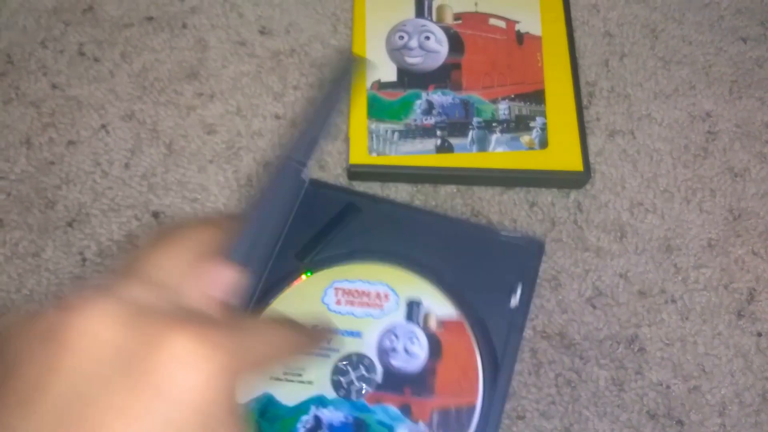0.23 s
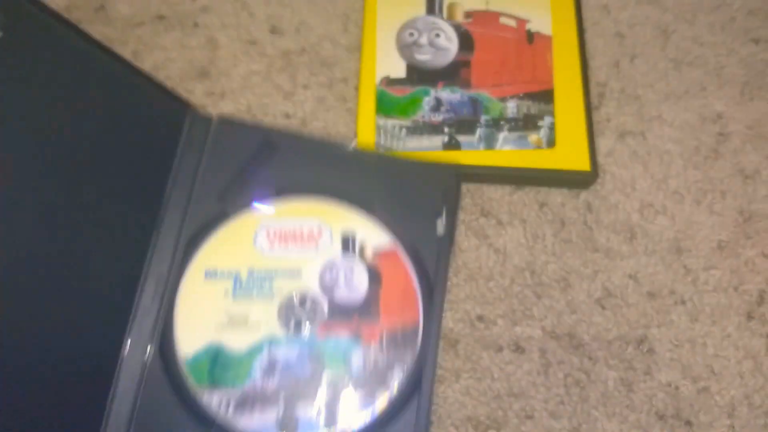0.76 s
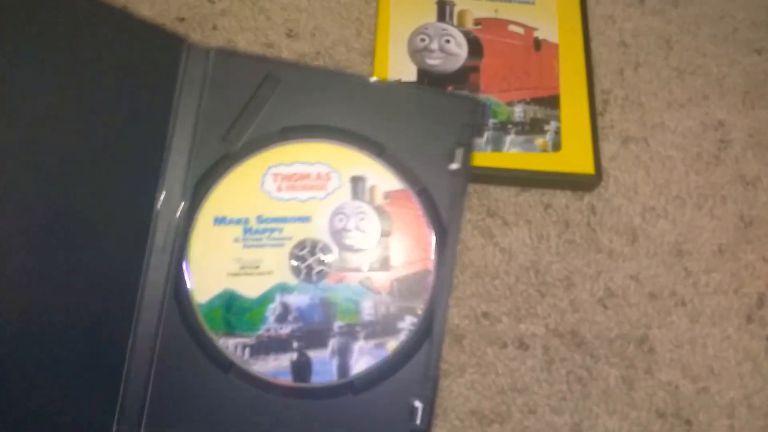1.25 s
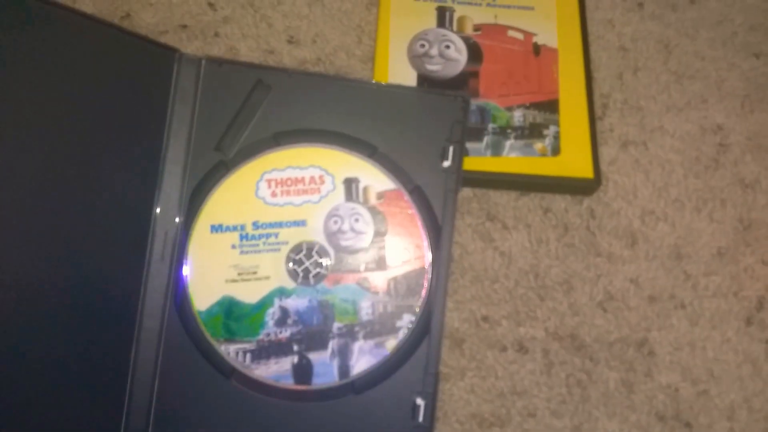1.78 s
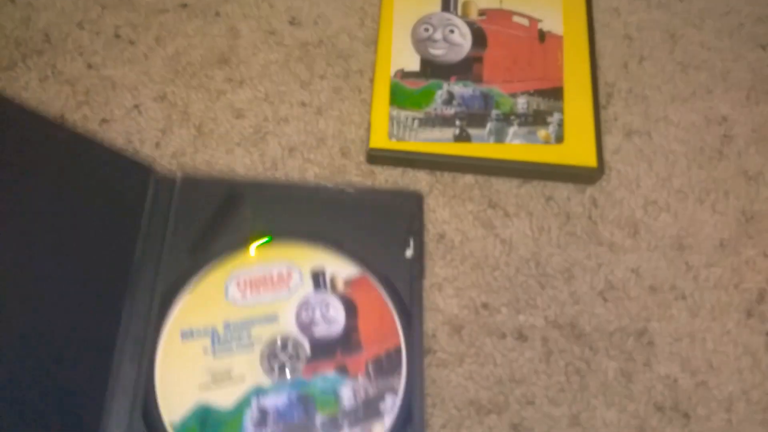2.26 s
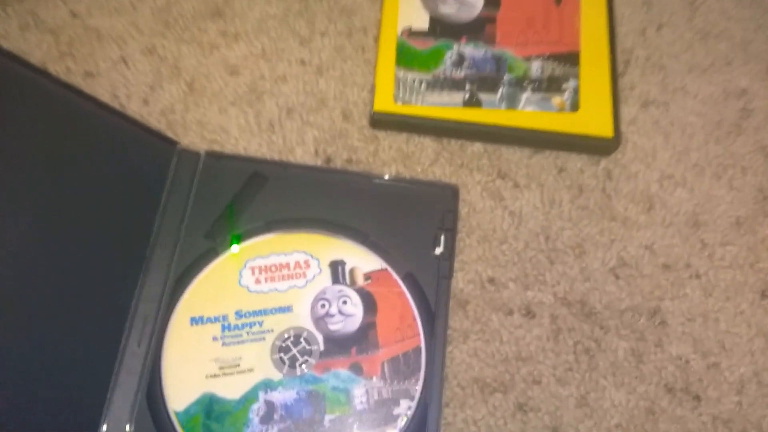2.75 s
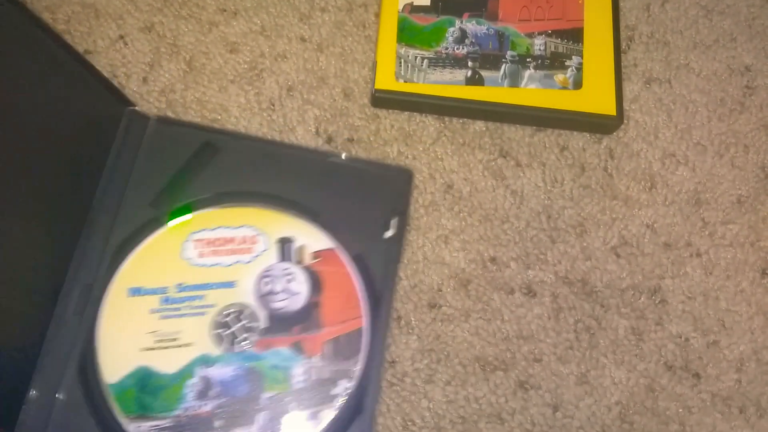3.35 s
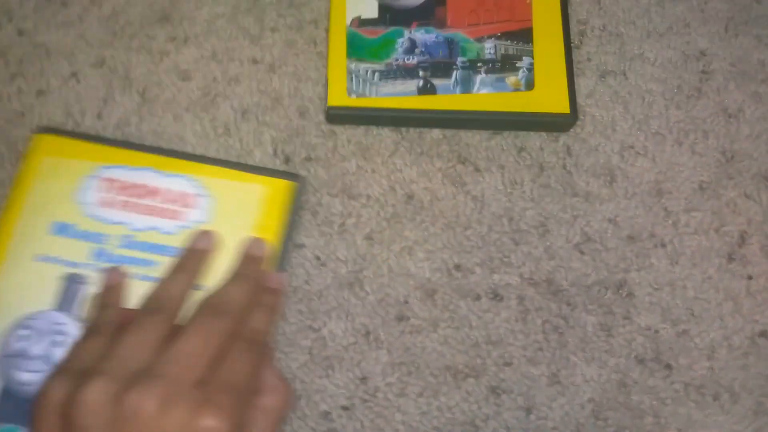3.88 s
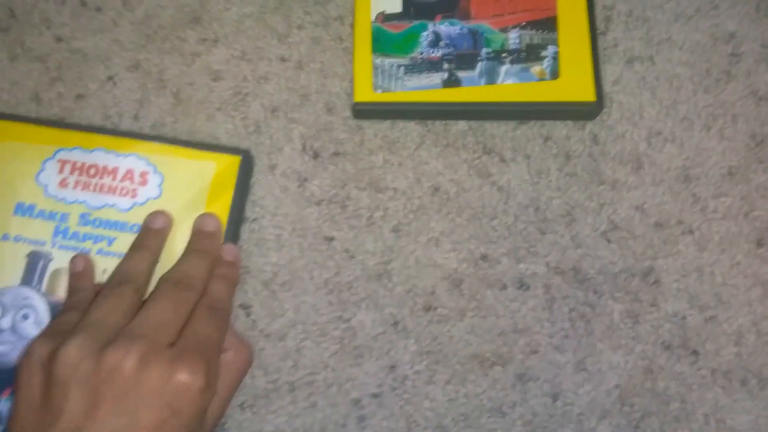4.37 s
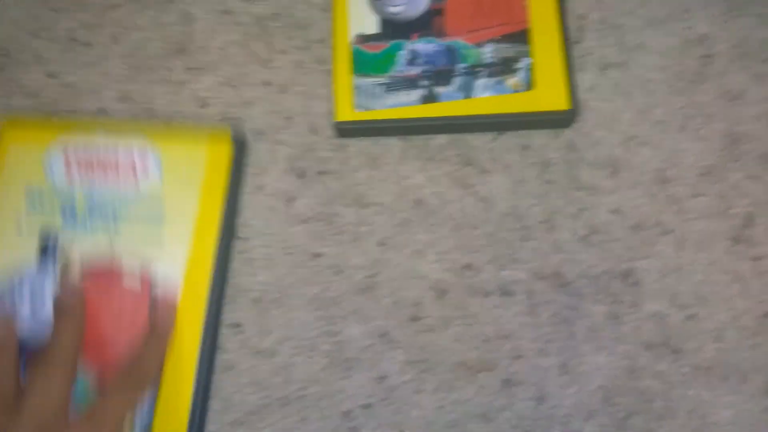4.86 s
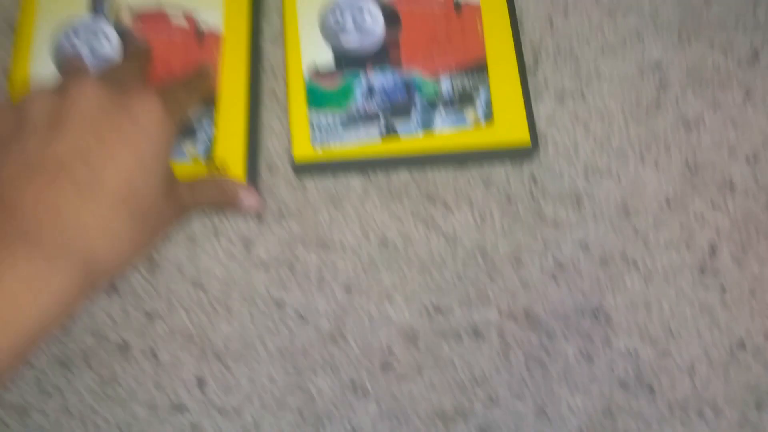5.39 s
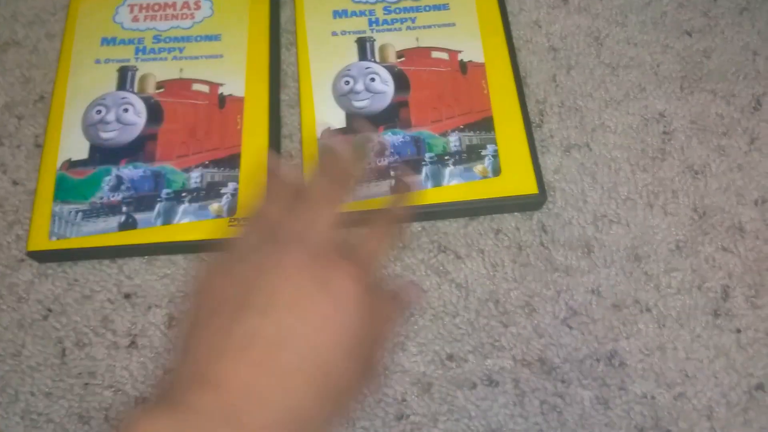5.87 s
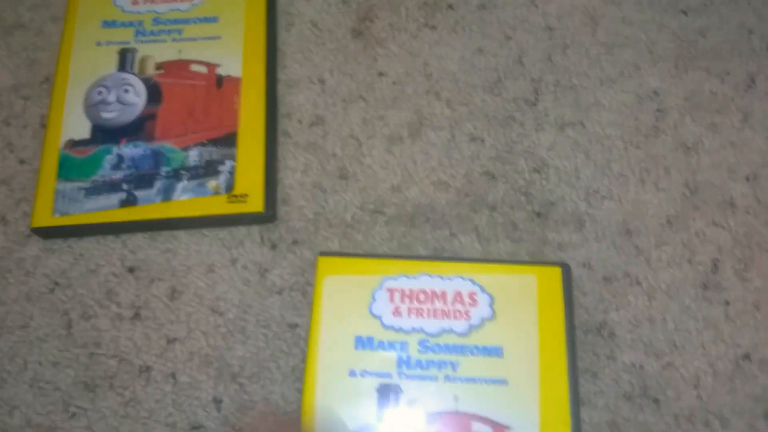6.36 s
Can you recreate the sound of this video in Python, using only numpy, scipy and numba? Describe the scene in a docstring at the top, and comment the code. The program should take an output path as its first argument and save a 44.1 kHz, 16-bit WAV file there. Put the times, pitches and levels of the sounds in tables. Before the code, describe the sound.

Sharp plastic clicks of a thin case being opened, closed and set down on carpet, with faint rubbing, small squeaks and low handling bumps.

```python
"""A plastic disc case is opened, shifted, snapped shut and slid over a carpet near the left port of a phone.
Clicks of clasps and edges: a blow, slips and loose rattle ring damped modes of shell, edges and crack.
Squeaks are noise in gliding bands; fingers and carpet rustle as flickering coloured noise; the hand thuds
on the phone as swelling band-passed bass. A short dull room tail follows the clicks.
The phone widens its two ports by subtracting each from the other a moment later."""
import sys
import numpy as np
from scipy import signal
from scipy.fft import rfft, irfft, next_fast_len
from scipy.io import wavfile
from scipy.ndimage import uniform_filter1d
from numba import njit

SR = 44100
rng = np.random.default_rng(int(sys.argv[2]) if len(sys.argv) > 2 else 0)


def persist_wave(psi):
    """Save psi, clipped to +-1, as 16-bit WAV."""
    counts = np.round(np.clip(psi, -1, 1) * 32767).astype(np.int16)
    wavfile.write(sys.argv[1], SR, np.atleast_2d(counts).T)


N = 292383

# rubbing and room hush: t/s, rustle level/dB, hiss level/dB, rumble level/dB (before the rumble gain)
HUSH = [(0.0, -70, -73.5, -63.5), (0.15, -72, -74.5, -73), (0.29, -75.5, -82.5, -73.5),
        (0.64, -74.5, -83, -73.5), (1.03, -73.5, -79.5, -73), (1.64, -67.5, -82, -64.5),
        (2.12, -68, -70, -61), (2.3, -61, -75, -66.5), (2.6, -64.5, -74, -62.5), (2.77, -65, -82, -63),
        (2.94, -63, -72.5, -62.5), (3.12, -67, -76, -70.5), (3.55, -66, -72.5, -62.5),
        (3.9, -58.5, -69, -57.5), (4.03, -72, -78.5, -74), (4.63, -70, -77, -65.5), (4.95, -63.5, -71, -61),
        (5.35, -65, -76, -59.5), (5.8, -68.5, -79, -61), (6.15, -60.5, -70.5, -62.5),
        (6.63, -65, -74, -61.5)]


def undb(db):
    """Amplitude factor from dB."""
    return 10 ** (np.asarray(db) / 20)


def unit(x):
    """Scale to rms 1."""
    return x / np.sqrt(np.mean(x ** 2))


def decay(t_s, t60_s):
    """Exponential fade, -60 dB after t60."""
    return np.exp(-np.log(1000) * t_s / t60_s)


def curves(table):
    """Interpolate each column over time, one value per sample."""
    t_s, *columns = np.transpose(table)
    return [np.interp(np.arange(N) / SR, t_s, column) for column in columns]


def colour(x, points):
    """Shape the spectrum by (f/Hz, level/dB) points on a log frequency axis; rms 1."""
    size = next_fast_len(N)
    hz, db = np.transpose(points)
    log_hz = np.log(np.arange(size // 2 + 1) * SR / size + 1)
    gain = undb(np.interp(log_hz, np.log(hz), db, left=-60))
    return unit(irfft(rfft(x, size) * gain, size)[..., :N])


def lowpass(x, hz):
    """First-order low-pass."""
    return signal.lfilter(*signal.butter(1, hz, fs=SR), x)


def walk(rate_hz):
    """Random levels held 1 / rate and slewed; spread near 1."""
    hold = int(SR / rate_hz)
    steps = np.repeat(rng.standard_normal(N // hold + 1), hold)
    return 1.3 * uniform_filter1d(steps, hold)[:N]


@njit
def svf(x, hz, damp):
    """State-variable band-pass with a moving centre; damp is bandwidth / centre."""
    y, band, low = np.empty(len(x)), 0., 0.
    for i in range(len(x)):
        g = np.tan(np.pi * hz[i] / SR)
        v = (band + g * (x[i] - low)) / (1 + g * (g + damp))
        band, low, y[i] = 2 * v - band, low + 2 * g * v, damp * v
    return y


def band_noise(hz, damp):
    """Noise through two band-passes in series, following the centre hz; rms 1."""
    noise = rng.standard_normal(len(hz))
    return unit(svf(svf(noise, hz, damp), hz, damp))


def ring(push, modes, near_hz, favour_db=11.0, scatter_db=2.0, phase=0.53):
    """Damped modes; the spot hit favours those near one pitch. Scaled to peak 1 under the push's start."""
    hz, db, t60_s = np.transpose(modes)[:, :, None]
    level_chance, pitch_chance = rng.standard_normal((2, len(modes), 1))
    db = db + scatter_db * level_chance - favour_db * np.log2(hz / near_hz) ** 2  # loss per octave squared
    t = np.arange(1024) / SR
    swing = np.sin(2 * np.pi * hz * (1 + pitch_chance / 50) * t + phase)
    contact = 1 - np.exp(-t * hz * 4)  # time constant: a quarter cycle
    tone = np.sum(undb(db) * swing * contact * decay(t, t60_s), axis=0)
    return tone / np.abs(signal.fftconvolve(push[:1024], tone)).max()


def click_push(crack_db, shell_db, chatter_s, rattle_db, size):
    """Force of one click: a blow, a dying chatter of slips, then loose parts rattle."""
    rattle_t60_s, slips_per_s = 0.15, 5000
    t = np.arange(size) / SR
    age = t / chatter_s
    slips = rng.standard_normal(size) * (rng.random(size) < slips_per_s / SR)
    push = slips * np.sqrt(age) * np.exp(-age)
    blow = undb(.9 * (crack_db + shell_db + 25))  # a hard snap lets go at once, a soft one crumbles
    push[[14, 40]] = -.3 * blow, blow  # the plastic yields a moment before it lets go
    bursts = undb(4.55 * np.repeat(rng.standard_normal(size // 64), 64))
    loose = rng.standard_normal(size) * bursts
    return push + undb(rattle_db - 9.0) * loose * decay(t, rattle_t60_s)


def clicks():
    """Each push rings shell, edges and crack modes; the right port lies in the phone's shadow."""
    # clicks and snaps; levels before the fixed offsets below: t/s, crack level/dB, shell over crack/dB,
    # edges over crack/dB, chatter time constant/s, rattle level/dB, left minus right/dB, favoured shell f/Hz
    click_events = [(0.1532, -18.5, -5, -5, 0.0023, -26.5, 3, 740),
                    (0.195, -56.5, 5, 10, 0.0071, -2, 9, 1200),
                    (0.279, -71.5, 8.5, 7.5, 0.0022, -34.5, 11, 356),
                    (0.307, -71.5, -9, 6, .003, -20, 16, 824), (0.4794, -70, 4, 1.5, 0.0011, -7, -5, 751),
                    (0.6429, -51, 6, 2.5, 0.0035, -12, 4.5, 940), (0.693, -72.5, 17, 8, 0.013, -7, 8, 816),
                    (0.748, -75, 17, 7, 0.0091, -11, 12, 1170), (1.023, -72.5, 9, 0, 0.003, -23, 4, 690),
                    (2.0898, -26, -1.5, -1.4, 0.0025, -22, 8, 684),
                    (2.132, -56, 11.5, 5, .0019, 7, 10, 1050), (2.165, -59.5, 6.5, 4, .0028, 4, 13, 1380),
                    (2.2036, -47.5, 5, 2.5, 0.0041, -14, 9, 950),
                    (2.251, -60.5, 9.5, 10.5, 0.0059, -35, 3, 706),
                    (2.2665, -57.5, 10, 1, .0026, -23.5, -5.5, 635),
                    (2.2807, -51, -10, 6.5, 0.0016, -23, 11, 1060),
                    (2.3, -61, 9, 11, 0.0038, -14.5, 2, 668), (2.346, -54, -8, -8, 0.002, 10, -1, 754),
                    (2.367, -57, -8, -3, .0019, -16, 6, 619), (2.406, -60.5, 12, 6.5, 0.0033, -11, 1, 790),
                    (2.439, -63, 15, 5.5, 0.0027, -4, 2, 583), (2.661, -57, -1, -22, .0044, -27, 12, 355),
                    (2.7383, -45, -11, -10, 0.0027, -18.5, 18, 555),
                    (2.89, -69.5, 12.5, -15, 0.0036, -18, 2, 353),
                    (2.936, -59, 8, -7, 0.0061, -33.5, 18, 1040),
                    (2.963, -70.5, 19, 11, 0.0027, 1, 18, 527),
                    (2.9844, -38.5, -4, -2.5, 0.0087, -29, 19, 950),
                    (2.9918, -36, 1.5, -8, .0041, -22, 20, 624), (3.051, -49, 9.5, 3, 0.0041, -22, 17, 576),
                    (3.056, -45.5, 3, -4, 0.0042, -21.5, 19, 980),
                    (3.067, -44, -2.5, -2, 0.0032, -20, 7, 850),
                    (3.545, -49.5, -7.5, -10, 0.0043, -12, 19, 550),
                    (3.554, -54, -12, 2.5, 0.0013, -38, 14, 650),
                    (3.584, -59, 7.5, 2, 0.0041, -33, -1, 830),
                    (3.6164, -69.5, 14.5, 5, 0.0034, -13, 3, 466),
                    (3.7243, -38.5, -10, -12, 0.0014, -35, 13, 1320),
                    (3.733, -37, -0.5, -8.5, 0.0017, -19.5, 3.5, 1110),
                    (3.7427, -44, -0.5, -1.1, 0.0052, -25.5, 5, 1190),
                    (3.8084, -64.5, 9.5, -0.3, .0025, -28, -4, 816),
                    (3.9669, -19.5, 5.5, 1, .0029, -30, 3.5, 823),
                    (4.2784, -21.5, -1, -4, 0.0024, -24, 5, 800),
                    (4.556, -67, 8.5, -16, 0.0026, -7, 9, 632),
                    (4.5864, -49, -8, -40, 0.0027, -17, 27, 713),
                    (4.594, -37, -13, -20.5, 0.0026, -29, 32, 778),
                    (4.786, -49.5, 4.5, -5.5, 0.0038, -21, 11, 793),
                    (4.989, -61, 13.5, -8, 0.0015, -30, 2, 397),
                    (5.681, -51, -9.5, -13, 0.00085, -10, 22, 496),
                    (5.71, -65, -11, -25.5, 0.0021, -17, 6.5, 673),
                    (5.725, -51, -8, -9.5, .003, -11.5, 31, 778),
                    (5.9755, -44.5, -1.5, -1, 0.0072, -16, 16, 643),
                    (6, -61.5, 11, 5.5, .002, -12, 10, 696),
                    (6.056, -42.5, -1, -9.5, 0.0027, -17.5, -1, 695),
                    (6.091, -46.5, -2, -12, .0022, -21, 6, 620),
                    (6.213, -36, -6, -14, 0.0033, -22, 27, 1080),
                    (6.221, -40.5, 8, -3.5, 0.0018, -30, 18, 710),
                    (6.4644, -60, 3, -5, .0022, -26, 8, 1010), (6.4985, -64.5, 13, 8, 0.0032, -2.5, 3, 790),
                    (6.584, -61, 6.5, -3, 0.002, -30, 6, 595)]
    # modes of the hollow shell, the edges and the crack, before scatter and favour: f/Hz, level/dB, t60/s
    shell_modes = [(190, -15.5, 0.013), (344, -5.5, 0.013), (420, -6.5, 0.0072), (600, -5.5, 0.011),
                   (770, -8.5, 0.013), (927, 3, 0.0056), (1190, -1, 0.0079), (1770, -5, 0.015)]
    edge_modes = [(1930, 5, 0.0049), (2206, 1, .008), (2540, 0.5, 0.0073), (3020, -1.5, .008),
                  (3515, 1, 0.0055), (4130, 0.5, 0.003), (4200, 1, 0.0084)]
    crack_modes = [(5000, 4, 0.004), (5840, 23.5, 0.0011), (6100, -39.5, .003), (7600, -6.5, 0.0072),
                   (8850, -10.5, 0.0028), (11200, -29.5, .0015), (13000, -28.5, .0015)]
    knock_hz, knock_db = 230, -14  # every click also knocks the whole case
    crack_base_hz, brighter_hz_per_db, dry_edge_db = 5550, 77, 19
    shadow_hz, shadow_dip_hz, shadow_dip_q = 2600, 1000, 1.6
    size = 8192
    out = np.zeros((2, N + size))
    for t_s, crack_db, shell_db, edge_db, chatter_s, rattle_db, pan_db, shell_hz in click_events:
        push = click_push(crack_db, shell_db, chatter_s, rattle_db, size)
        knock = undb(knock_db) * ring(push, shell_modes, knock_hz)
        shell = undb(shell_db + 3.0) * (ring(push, shell_modes, shell_hz) + knock)
        edges = undb(edge_db + 5.5) * ring(push, edge_modes, 2830.0)
        # clicks that hardly ring the edges crack brighter
        crack_hz = crack_base_hz + brighter_hz_per_db * max(dry_edge_db - edge_db, 0)
        crack = ring(push, crack_modes, crack_hz)
        sound = signal.fftconvolve(push, crack + shell + edges)[:size]
        at = int(t_s * SR) + 24
        out[:, at:at + size] += sound * undb(crack_db + 5.5 - np.array([[0], [pan_db]]))
    left, right = signal.lfilter(*signal.butter(2, 140, "high", fs=SR), out[:, :N])
    # paths round both sides of the phone cancel in one band
    dip = signal.iirnotch(shadow_dip_hz, shadow_dip_q, SR)
    return np.array([left, signal.lfilter(*dip, lowpass(right, shadow_hz))])


def squeaks():
    """Dense rubs that sing: noise in a gliding band."""
    # brief rubs: start/s, end/s, start f/Hz, end f/Hz, bandwidth/centre, level/dB (before fades and flicker),
    # right port gain/left
    rub_events = [(1.435, 1.537, 570, 555, 0.035, -67.5, 0.38),
                  (1.483, 1.632, 1390, 1340, 0.16, -75, 0.071), (2.46, 2.552, 6850, 6700, 0.37, -66.5, 0),
                  (2.74, 2.86, 3020, 2780, 1, -66, 0.1), (2.751, 2.847, 3410, 3200, 0.037, -70, 0.058),
                  (2.745, 2.848, 2090, 2130, 0.051, -53.5, 0.19),
                  (2.749, 2.849, 4100, 4200, 0.057, -60.5, 0.024),
                  (4.701, 4.76, 3570, 3870, .012, -78, 0.2), (4.8, 4.87, 3470, 3440, .012, -79, 0.25),
                  (4.855, 4.96, 3500, 3020, 0.011, -81, 0.2), (4.96, 5.09, 3050, 2900, .015, -83, 0.2),
                  (0.059, 0.148, 300, 300, 0.18, -61, 0.3), (6.102, 6.604, 4800, 4370, 0.14, -73.5, 0.14)]
    out = np.zeros((2, N))
    for start_s, end_s, from_hz, to_hz, width, db, right in rub_events:
        a, b = int(start_s * SR), int(end_s * SR)
        rub = band_noise(np.linspace(from_hz, to_hz, b - a), width)
        fades = signal.windows.tukey(b - a, .4)
        flicker = undb(1.4 * walk(60)[a:b])
        out[:, a:b] += undb(db) * fades * flicker * rub * np.array([[1], [right]])
    return out


def thuds():
    """Bass level, centre and deep level: each thud swells over the hush, pulls the centre and fades."""
    # thuds of hand and case, levels before the rumble gain: t/s, level/dB, centre f/Hz, deep level/dB, t60/s
    thud_events = [(0.16, -59, 175, -79.5, 0.31), (1.27, -69, 140, -84, .5), (2.1, -62, 156, -68, 0.34),
                   (2.47, -40.5, 123, -52.5, 0.58), (2.75, -56.5, 138, -68, 0.58),
                   (2.95, -64.5, 120, -64.5, .8), (3.05, -59.5, 122, -72.5, .5),
                   (3.231, -59.5, 121, -83.5, 1.5), (3.75, -49, 137, -80.5, .35),
                   (3.97, -48, 195, -60.5, 0.11), (4.28, -61.5, 187, -67, .35), (6.08, -59, 164, -78, .4),
                   (6.24, -58.5, 169, -77, 0.33), (6.45, -62, 135, -62, 3)]
    rise_s, hush_hz, deep_below_db = .025, 135, -11.5
    level = undb(curves(HUSH)[2])
    deep, pull = level * undb(deep_below_db), level * hush_hz
    for t_s, db, hz, deep_db, t60_s in thud_events:
        age = np.arange(N) / SR - t_s
        shape = np.exp(np.where(age < 0, age / rise_s, -np.log(1000) * age / t60_s))
        level = level + undb(db) * shape
        pull = pull + undb(db) * shape * hz  # level-weighted centre
        deep = deep + undb(deep_db) * shape
    return level, pull / level, deep


def rumble():
    """Dull throbbing bass noise, mostly at the left port and a little opposed at the right."""
    level, hz, deep_level = thuds()
    a, b = band_noise(hz, 1.0), band_noise(hz, 1.0)
    deep = band_noise(np.full(N, 55.), .8)
    left = level * a + deep_level * deep
    right = 0.55 * level * b - 0.23 * left
    gain_db = 4.5 + 1.5 * walk(17)
    return undb(gain_db) * np.array([left, right])


def rustle():
    """Fine, slightly flickering noise of fingers and carpet over the hush."""
    # spectra of rustle and hiss: f/Hz, relative level/dB per Hz
    rustle_tone = [(250, -2.5), (500, -8), (1000, -12.5), (2000, -17), (4000, -21), (8000, -32.5)]
    hiss_tone = [(1000, -14.5), (2000, -3.5), (4000, -5), (7000, -4), (10000, -8.5), (14000, -19)]
    body_db, hiss_db, _ = curves(HUSH)
    flicker = undb(0.88 * walk(5.6) + 0.47 * walk(26) + 0.48 * walk(150))
    body, hiss = rng.standard_normal((2, 2, N)) * flicker
    return undb(body_db) * colour(body, rustle_tone) + undb(hiss_db) * colour(hiss, hiss_tone)


def room(x):
    """A carpeted room answers with a short dull noise tail, different at each port."""
    t60_s, tail_db, dull_hz, rise_s = 0.25, -32.5, 3500, 0.0088
    t = np.arange(int(.3 * SR)) / SR
    noise = lowpass(rng.standard_normal((2, len(t))), dull_hz)
    tail = noise * decay(t, t60_s) * np.clip(t / rise_s, 0, 1)
    tail = tail / np.sqrt(np.sum(tail ** 2) / 2)  # mean energy 1 per port
    return undb(tail_db) * signal.fftconvolve(x[None], tail, axes=1)[:, :N]


def scene():
    """Sum of all layers; the room answers the left port's clicks."""
    case = clicks()
    return case + room(case[0]) + squeaks() + rumble() + rustle()


def record(dry):
    """Above the bass, each port is subtracted from the other after a short, blurred lag; the top is cut."""
    lag_s, blur_s, mix, low_hz, top_hz = 20.5 / SR, 1.15 / SR, .96, 500, 14300
    taps = np.exp(-.5 * ((np.arange(64) / SR - lag_s) / blur_s) ** 2)
    swapped = dry[::-1]
    other = swapped - uniform_filter1d(swapped, int(SR / low_hz))  # minus a running mean: bass removed
    wide = dry - mix * signal.lfilter(taps / taps.sum(), 1, other)
    return signal.sosfilt(signal.ellip(8, .2, 70, top_hz, fs=SR, output="sos"), wide)


dry = scene()
out = record(dry)
persist_wave(out)
```